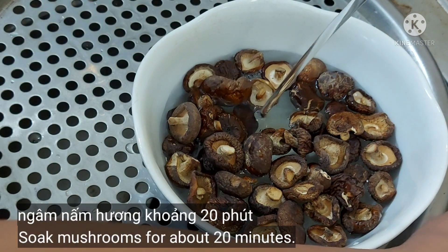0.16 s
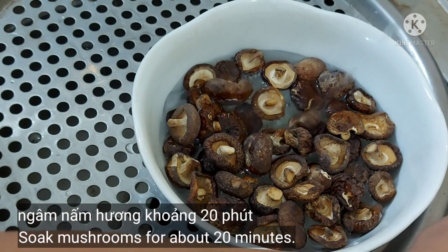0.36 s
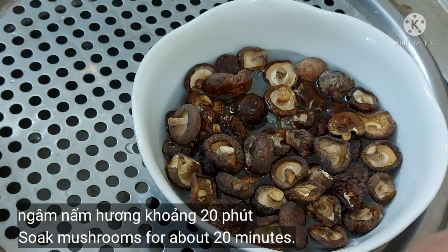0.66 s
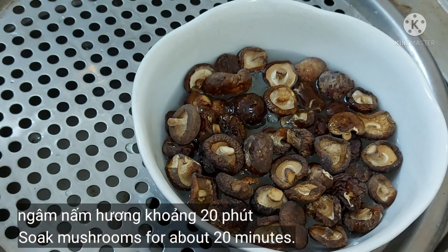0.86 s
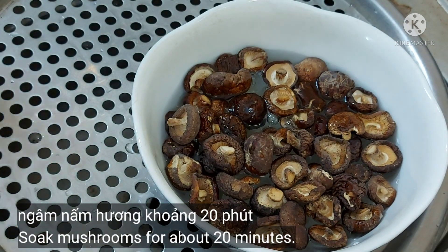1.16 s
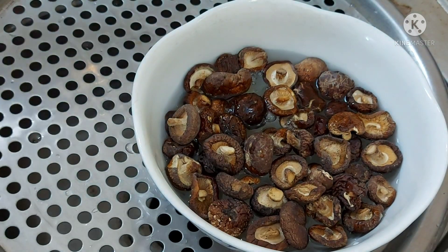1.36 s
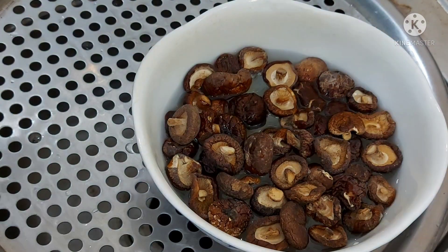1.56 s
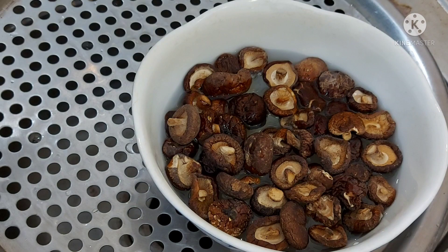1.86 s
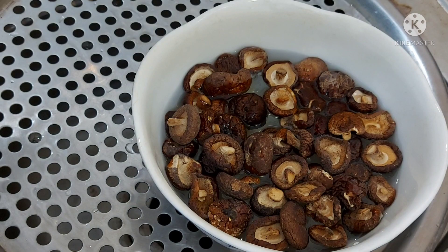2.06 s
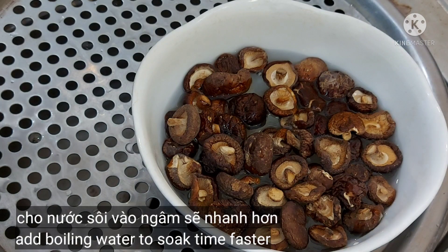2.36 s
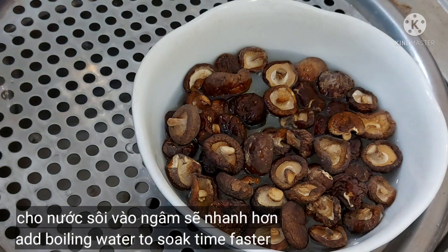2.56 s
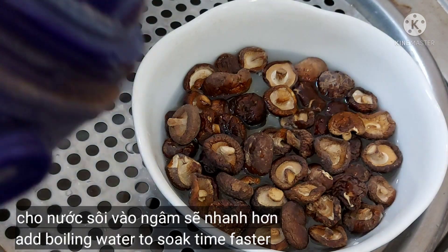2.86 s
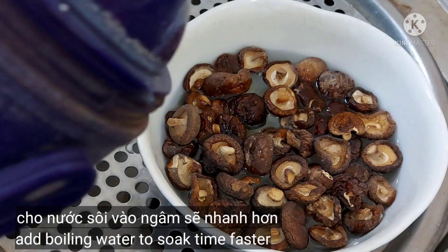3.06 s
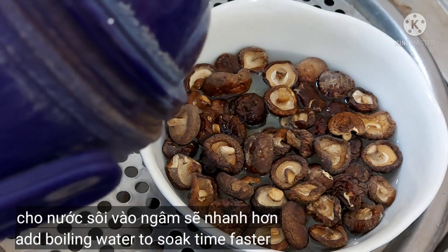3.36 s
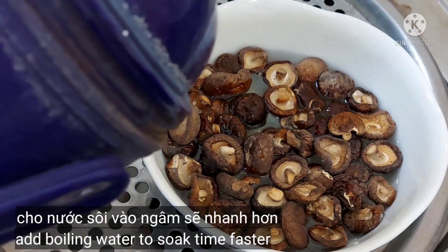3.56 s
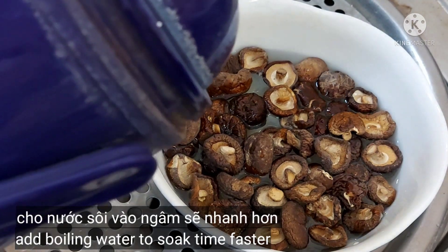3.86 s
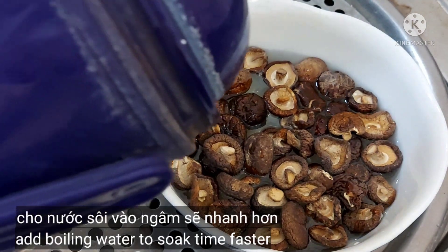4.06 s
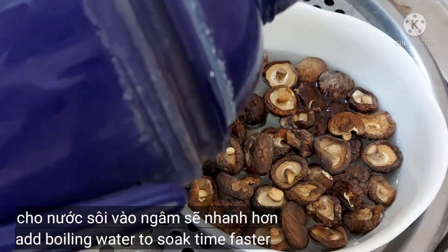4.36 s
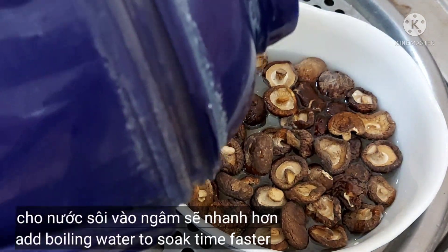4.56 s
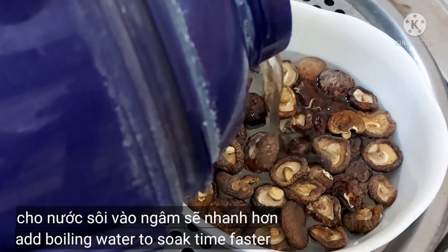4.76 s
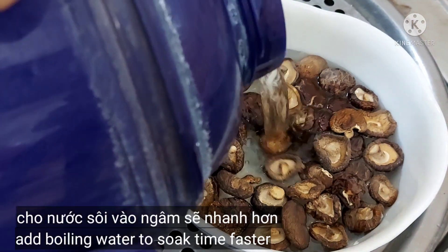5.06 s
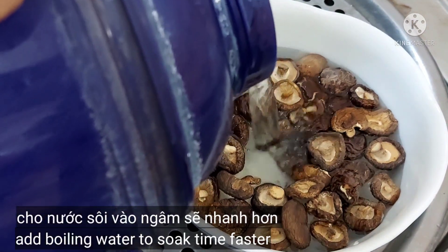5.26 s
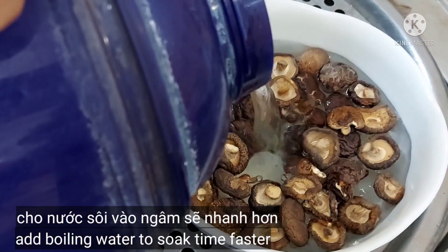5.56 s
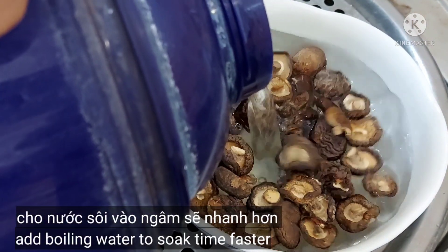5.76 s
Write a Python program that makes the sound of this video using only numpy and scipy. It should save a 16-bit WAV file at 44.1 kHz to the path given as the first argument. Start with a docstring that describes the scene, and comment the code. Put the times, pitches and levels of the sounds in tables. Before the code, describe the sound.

Ceramic and metal knocks on a thin metal worktop in a humming, echoing kitchen, then hot water pours from a flask into a bowl of mushrooms.

```python
"""A quiet kitchen, two spaced microphones: room noise (shaped noise), an appliance's hum and a thin tone (sines),
and a faint noise rustle that comes and goes. From 0.4 s vessels knock on a metal worktop, mostly off to the left:
noise bursts, sheet modes and low thuds, with hard walls ringing as sparse echoes. At 1.5 s an edit fades to silence
and back, then more knocks and two low glugs near 3 s (dying sines). From 4.7 s hot water slides from a flask into
a bowl: a fizz of tiny sine grains, spatters of band noise, and bubbles of rising pitch."""
import sys
import numpy as np
from scipy import signal
from scipy.fft import rfft, irfft
from scipy.io import wavfile
from scipy.ndimage import uniform_filter1d

SR = 44100
rng = np.random.default_rng(int(sys.argv[2]) if len(sys.argv) > 2 else 0)


def digitize_waveform(pressure):
    """Quantize a signal to 16-bit integers and store it at the path in sys.argv[1].

    Rows of a 2-D input are taken as channels; values are limited to [-1, 1].
    """
    field = np.atleast_2d(pressure).T
    bounded = np.clip(field, -1, 1)
    quanta = np.round(bounded * 32767).astype(np.int16)
    wavfile.write(sys.argv[1], SR, quanta)


N = 261072

# Spectrum of the room noise: [f/Hz, relative level/dB per Hz]
ROOM_COLOUR = [(36, -49), (44, 0), (70, -17.5), (90, -2), (130, -3), (160, -5.5), (260, -12), (320, -6.5),
               (390, -16), (600, -16), (1250, -27.5), (1800, -31.5), (5200, -45.5), (7000, -48),
               (8400, -41.5), (9800, -48.5), (12000, -45), (15200, -55.5), (15800, -75)]
ROOM_DB = -45  # rms ahead of the bass cut
# Likeness of the two microphones in noise: [f/Hz, correlation -1..1]
MIC_LIKENESS = [(60, 0.99), (180, 0.86), (550, 0.37), (1650, -0.2), (4970, 0.0066), (15000, -0.096)]
# Left microphone over right in noise: [f/Hz, level difference/dB]
MIC_LEAN = [(60, -2), (300, 5.5), (1000, 1.5), (4000, 1.6), (15000, 1.7)]
# Appliance hum, a motor shaft (49 Hz and its 4th order) beside the mains buzz: [f/Hz, rms level/dB]
HUM_TONES = [(49.0, -53), (196.0, -56), (100.07, -50.5), (200.2, -53.5), (300.3, -59)]
# Thin tone that swells and sinks before the edit: [t/s, level/dB ahead of its wobble]
WHINE_LEVEL = [(0, -89), (.09, -68), (.178, -75), (.288, -58.5), (.356, -68), (.375, -85), (.41, -62),
               (.45, -80), (.63, -80), (.68, -61.5), (.842, -55), (.9, -76), (1.1, -70), (1.21, -59),
               (1.24, -68), (1.372, -56), (1.406, -82), (1.49, -53.5), (1.53, -70)]
# Fainter tone after the edit: [t/s, rms level/dB]
FAINT_LEVEL = [(2.3, -85), (2.6, -67), (3.1, -73), (4.2, -79), (5.92, -78)]
WHINE_HZ, FAINT_HZ = 987, 1211
# Broad rustle over the room noise, one list a stretch: [t/s, rms level/dB]
RUSTLE_STRETCHES = [
    [(0, -84), (.28, -78), (.5, -57.5), (.8, -80), (.93, -72), (1.1, -64), (1.38, -59.5), (1.45, -52.5),
     (1.54, -51.5)],
    [(1.79, -84), (1.83, -59), (1.95, -75), (2.15, -71), (2.2, -49), (2.26, -58), (2.32, -68), (2.78, -67),
     (3.2, -77)],
]
# Spectrum of the rustle: [f/Hz, relative level/dB per Hz]
RUSTLE_COLOUR = [(500, -29), (800, -13), (2000, -6), (3000, -10.5), (6000, -14), (8500, -15.5),
                 (12500, -13.5), (15200, -18), (15800, -44)]

# Knocks: [t/s, crack drive level/dB, treble lift/dB, contact length/s, clack f/Hz, thud level/dB, thud f/Hz,
# left over right/dB, room level/dB]
KNOCK_EVENTS = [(0.412, -57.5, 20.5, 0.0031, 7750, -58, 195, 6, -3.5),
                (.465, -37, -4.5, 0.0064, 920, -22.5, 307, 6, -3),
                (.499, -44, -8, 0.0035, 4100, -32.5, 132, 6, -10),
                (.501, -46.5, 9.5, 0.0011, 7000, -48, 200, -10, -4),
                (.526, -56, -6, 0.0025, 1100, -30, 111, 1, -11),
                (1.766, -56, -4, 0.0037, 2500, -62, 201, 11, 7),
                (1.779, -68, 3, 0.0018, 9000, -38, 312, 20, 10.5),
                (1.807, -44, 0.5, 0.0017, 1500, -33, 135, 9.5, -5),
                (1.844, -50, -7, 0.0094, 1500, -36.5, 98, 3, 5.5),
                (1.859, -50.5, 1, 0.0026, 11000, -36, 273, 20, 6.5),
                (1.89, -35.5, -3, 0.0071, 3980, -32, 340, 9.5, -4.5),
                (2.109, -50.5, -11, .004, 1080, -36.5, 310, 22, 6),
                (2.151, -41.5, -7, 0.0086, 1700, -41, 293, 13.5, -3),
                (2.21, -31.5, -3, 0.0063, 2010, -32, 279, 8.5, -9),
                (2.234, -47, -5, 0.0057, 2000, -34, 414, -2, 4.5),
                (2.265, -50, 4, .004, 11000, -33, 113, 4, 0),
                (2.299, -37.5, 1, 0.0021, 2030, -29.5, 126, 5, 1.5),
                (2.317, -33, 3.5, 0.0025, 3270, -24.5, 287, 16, -5),
                (2.639, -57.5, 9, .006, 5040, -58, 223, 11, -2),
                (2.955, -55, 2, 0.0057, 2760, -68, 158, 15, 6),
                (3.037, -56, 3, .0023, 11500, -43, 184, 13, -2),
                (3.189, -56.5, 6, .003, 2500, -40, 183, 6, -9),
                (3.25, -34, 1, .0067, 1530, -39.5, 161, -17, 6.5),
                (3.254, -32, 2, .011, 12000, -27, 316.6, 12.5, 4),
                (3.273, -29.5, -8, 0.0067, 1460, -28, 251, -3, -5),
                (3.298, -35, -14, .012, 760, -25, 234, 1, 2.5),
                (3.438, -50.5, 1.5, .0042, 13000, -39, 232, 14, 6.5),
                (4.433, -54.5, 3.5, .005, 12000, -44, 190, 10, -2)]
# Spectrum shared by the cracks: [f/Hz, relative level/dB]
CRACK_COLOUR = [(80, 9), (150, 19.5), (500, 11), (1200, 15), (2500, 8.5), (4000, 3), (6000, -2.5),
                (8500, -2), (12000, -3.5), (16000, -17.5)]
# Modes of the sheet-metal worktop: [f/Hz, relative level/dB, t60/s]
WORKTOP_MODES = [(638, 0, .22), (755, -3, .35), (819, -6, .25), (914, -6, .22), (959, -4, .25),
                 (1288, -7, .25), (1324, -10, .25), (1464, -9, .35), (1693, -9, .2), (2130, -12, .2),
                 (2400, -14, .15), (3700, -14, .1)]
CLACK_DB, CLACK_WIDTH = 6, 0.18  # boost at the vessel's resonance; its half-width as a share of the pitch
SWELL_S, SWELL_PER_CONTACT = 0.0033, 1.27  # thud rise time: base, plus seconds per second of contact
# Ringing of the hard walls: [f/Hz, t60/s]
WALL_T60 = [(100, 1), (250, 0.69), (1000, 0.72), (3000, 0.69), (6000, 0.64), (10000, 0.42), (15000, 0.47)]

# Edit: fade begins, silence, return begins, full level; both fades change fastest early
OUT_S, SILENT_S, BACK_S, FULL_S = 1.495, 1.565, 1.666, 1.784
OUT_BEND, BACK_BEND = 2.8, 2.4

# Loudest bubbles, from low glugs of air in the flask to small ones under the stream:
# [t/s, nominal peak level/dB, f/Hz]
BUBBLE_EVENTS = [(2.959, -33, 682), (3.019, -37, 683), (4.744, -44, 830), (4.778, -41, 3790),
                 (4.813, -43, 990), (4.874, -36.5, 787), (4.979, -44, 830), (5.029, -35.5, 1894),
                 (5.1063, -54, 1640), (5.1108, -39.5, 3780), (5.1377, -41.5, 4380), (5.222, -40, 568),
                 (5.243, -31, 680), (5.2599, -36.5, 3610), (5.264, -41, 590), (5.2714, -41.5, 3070),
                 (5.295, -38, 750), (5.2959, -45, 2130), (5.3926, -52, 3340), (5.5353, -52, 3000)]
BUBBLE_T60_S, SHORTER = 0.039, 0.55  # decay at 1000 Hz; power by which it shrinks with pitch
RISE = 0.16  # half the share by which the smallest bubbles climb in pitch over one t60
# Strength of the stream: [t/s, rms level/dB of its fizz]
STREAM_LEVEL = [(4.68, -91), (4.74, -66), (4.8, -57.5), (4.97, -58.5), (5.04, -54.5), (5.14, -53.5),
                (5.2, -63.5), (5.29, -51), (5.35, -67), (5.5, -59.5), (5.63, -62.5), (5.72, -68),
                (5.8, -59.5), (5.92, -62.5)]
# Spectrum of the fizz: [f/Hz, relative level/dB per Hz]
FIZZ_COLOUR = [(600, -10), (1200, -1), (2000, -1.5), (2700, -5), (3800, -3), (6900, -14), (8300, -10),
               (14500, -11.5), (16000, -35)]
# Loudest spatters: [t/s, peak level/dB of the two microphones' mean before panning, centre f/Hz, left over right/dB]
SPATTER_EVENTS = [(4.742, -52, 5500, -3), (4.778, -46, 11500, 2), (4.786, -41.5, 10700, 1),
                  (4.8747, -42.5, 7990, -7), (4.878, -41.5, 10500, 9), (4.9227, -38, 6800, .4),
                  (4.9267, -38.5, 13500, 1.1), (5.0098, -40.5, 8670, -8), (5.014, -42, 8500, -.4),
                  (5.0214, -38.5, 10100, .1), (5.0443, -41, 10500, 9), (5.096, -38, 8500, -2),
                  (5.1017, -47, 7850, -4), (5.1307, -39, 8950, 9), (5.15, -39, 8380, -9),
                  (5.1766, -39.5, 9900, 7), (5.2619, -41, 7930, -5), (5.2799, -33.5, 6500, -3),
                  (5.391, -45.5, 5880, -4), (5.4725, -42, 11200, 1), (5.6192, -41, 8700, -6),
                  (5.7784, -44, 6105, .4)]
SPATTER_WIDTH, SPATTER_S = 0.26, 0.0029  # share of the centre; decay time constant
# Small events in between: level over the fizz, and full spread, in dB
STRAY_SPATTER_DB, STRAY_BUBBLE_DB, STRAY_SPREAD_DB = 4.5, 2, 7
EDGE_HZ = 16300  # upper band limit


def gain_of(db):
    """Decibels to an amplitude factor."""
    return 10 ** (np.asarray(db) / 20)


def evened(x):
    """Scales to rms 1."""
    return x / np.sqrt(np.mean(x ** 2) + 1e-20)


def read(points, hz):
    """Reads a spectrum table on a log-frequency axis."""
    f, value = np.transpose(points)
    return np.interp(np.log(hz + 1), np.log(f + 1), value)


def level(rows):
    """Gain in time from [t/s, level/dB] rows, practically silent outside them."""
    s, db = np.transpose(rows)
    return gain_of(np.interp(np.arange(N) / SR, s, db, left=-150, right=-150))


def add(mix, s, sound):
    """Mixes a sound in at second s."""
    part = mix[..., round(s * SR):][..., :sound.shape[-1]]
    part += sound[..., :part.shape[-1]]


def panned(x, pan_db):
    """Places a sound: the left microphone gets pan_db more than the right."""
    return x * gain_of([[pan_db / 2], [-pan_db / 2]])


def wash(points, patchy_db, size):
    """Stereo noise of rms 1 with drifting patches, most alike at the two microphones in the bass."""
    hop = size // 4
    hz = np.fft.rfftfreq(size, 1 / SR)
    frames = N // hop + 5
    a, b, c, d, patches = rng.standard_normal((frames, len(hz), 5)).T
    patches = evened(uniform_filter1d(uniform_filter1d(patches, 10, 0), 10, 1))
    same = np.clip(read(MIC_LIKENESS, hz), -1, 1)[:, None]
    lean = gain_of(read(MIC_LEAN, hz) / 2)[:, None]
    left = a + 1j * b
    right = same * left + np.sqrt(1 - same ** 2) * (c + 1j * d)
    z = np.array([left * lean, right / lean])
    z *= gain_of(read(points, hz)[:, None] + patchy_db * patches)
    return evened(signal.istft(z, nperseg=size, noverlap=size - hop)[1][:, :N])


def room_noise():
    """The still air of the kitchen: steady noise, strongest in the bass."""
    return gain_of(ROOM_DB) * wash(ROOM_COLOUR, 1.0, size=2048)


def hum():
    """Steady tones of the appliance; neighbours beat against each other."""
    t = np.arange(N) / SR
    tones = 0
    for hz, db in HUM_TONES:
        tones = tones + gain_of(db) * np.sqrt(2) * np.sin(2 * np.pi * (hz * t + rng.random()))
    return tones


def narrow(width_hz):
    """Slow complex noise of rms 1: the wandering of a fuzzy tone."""
    z = rng.standard_normal(N) + 1j * rng.standard_normal(N)
    z /= 1 + (np.fft.fftfreq(N, 1 / SR) / width_hz * 2) ** 2
    return np.fft.ifft(z) * N / np.linalg.norm(z)


def whine():
    """Two fuzzy tones, a little stronger on the left: one before the edit, a much fainter one after it."""
    t = np.arange(N) / SR
    tone = ((1 + 0.25 * narrow(20)) * np.exp(2j * np.pi * WHINE_HZ * t)).real * level(WHINE_LEVEL)
    faint = (narrow(12) * np.exp(2j * np.pi * FAINT_HZ * t)).real * level(FAINT_LEVEL)
    return panned(np.sqrt(2) * (tone + faint), 2.8)


def rustle():
    """Broad patchy noise that swells and sinks in two stretches."""
    return wash(RUSTLE_COLOUR, 2.6, size=256) * sum(level(rows) for rows in RUSTLE_STRETCHES)


def contact(t, length):
    """Noise of a contact: soft start, quick end, and an even spectrum without chance peaks."""
    u = t / max(length, .0008)
    shape = np.exp(-u) * (1 - np.exp(-u / 0.042))
    burst = rng.standard_normal(len(t)) * shape
    for _ in range(3):  # flatten the spectrum, then restore the envelope
        z = rfft(burst)
        burst = irfft(z / np.sqrt(uniform_filter1d(abs(z) ** 2, size=5) + 1e-12))
        power = uniform_filter1d(burst ** 2, size=41)
        burst *= shape / np.sqrt(power + 1e-12 + 0.0044 * (burst ** 2).max())
    return burst


def rattled(blow):
    """The vessel rocks and the nearby surfaces answer: a few weaker copies within 14 ms."""
    at, sign = rng.random((2, 5))
    taps = np.zeros(700)
    places = (np.sort(at) * 500 + 110).astype(int)
    taps[places] = np.sign(sign - .5) * 0.43 * gain_of(-1.5 * np.arange(5))
    taps[0] = 1
    return signal.oaconvolve(blow, taps / np.linalg.norm(taps))[:len(blow)]


def knocks():
    """Blows of contact noise with a clack, sheet ringing and a low thud; returns direct sound and room feed."""
    near, far = np.zeros((2, N)), np.zeros((2, N))
    t = np.arange(8192) / SR
    hz = np.fft.rfftfreq(len(t), 1 / SR)
    modes = np.array([gain_of(db - 60 * t / t60) * np.sin(2 * np.pi * f * t) for f, db, t60 in WORKTOP_MODES])
    modes /= np.linalg.norm(modes.sum(0))
    for s, db, treble_db, length, clack_hz, thud_db, thud_hz, pan_db, room_db in KNOCK_EVENTS:
        burst = contact(t, length)
        # the broad resonance of the struck vessel
        clack_db = CLACK_DB / (1 + ((hz - clack_hz) / (CLACK_WIDTH * clack_hz)) ** 2)
        lift_db = np.interp(hz, [4000, 6500], [0, treble_db])
        crack = irfft(rfft(burst) * gain_of(read(CRACK_COLOUR, hz) + lift_db + clack_db))
        # each spot on the sheet wakes the modes differently
        ring = rng.uniform(.2, 1.96, len(modes)) @ modes
        ringing = 0.49 * gain_of(room_db) * signal.fftconvolve(burst, ring)[:len(t)]
        blow = rattled(gain_of(db) * (crack + ringing))
        # from the left: that microphone hears it first
        blow = np.array([np.roll(blow, 14), np.roll(blow, 28)])
        # a longer contact pushes the thud up more slowly
        swell_s = SWELL_S + SWELL_PER_CONTACT * length
        swell = (t / swell_s) ** 2 * np.exp(2 - 2 * t / swell_s)
        thud = gain_of(thud_db) * swell * np.sin(2 * np.pi * thud_hz * t)
        add(near, s, panned(blow, pan_db) + panned(thud, pan_db / 2))
        # much of the thud comes through the worktop, not the air
        add(far, s, gain_of(room_db) * (blow + 0.48 * thud))
    return near, far


def kitchen(x):
    """Wall echoes: sparse, of random sign, each band dying at its own speed, different at each microphone."""
    taps = np.zeros((2, SR))
    at = np.arange(160, SR - 20, 20) + rng.integers(0, 20, (2, (SR - 161) // 20))
    np.put_along_axis(taps, at, rng.choice([-1., 1.], at.shape), 1)
    hz, t, z = signal.stft(taps, SR, nperseg=256)
    apart = np.clip(hz / 500, 0, 1)[:, None]  # long waves reach both microphones alike
    z[1] = apart * z[1] + np.sqrt(1 - apart ** 2) * z[0]
    decay = gain_of(-60 * t / read(WALL_T60, hz)[:, None])
    tail = signal.istft(z * decay, SR, nperseg=256)[1]
    return signal.fftconvolve(x, tail / np.linalg.norm(tail[0]), axes=1)[:, :N]


def strays(count, lo_hz, hi_hz, over_db):
    """Chance events that follow the stream's strength: rows [t/s, peak level/dB, f/Hz, side -1..1]."""
    when, size, pitch, side = rng.random((count, 4)).T
    times, dbs = np.transpose(STREAM_LEVEL)
    s = times[0] + when * (times[-1] - times[0])
    db = np.interp(s, times, dbs) + over_db + STRAY_SPREAD_DB * (size - .5)
    return np.transpose([s, db, lo_hz * (hi_hz / lo_hz) ** pitch, 2 * side - 1])


def chirp(hz, t60, rise):
    """A wet tick, then a dying sine of climbing pitch; small bubbles ragged, large ones smooth and slow to start."""
    t = np.arange(4000) / SR
    small = min(hz / 3000, 1)
    tick = 0.11 * np.diff(rng.standard_normal(len(t) + 1)) * np.exp(-t / .0005)
    wobble = 1 + 0.78 * small * evened(uniform_filter1d(rng.standard_normal(len(t)), int(SR / hz)))
    start = 1 - np.exp(-t * hz / (0.38 + 2.0 * (1 - small)))
    tone = np.sin(2 * np.pi * hz * (t + rise * small * t ** 2 / t60))
    return small * tick + wobble * start * tone * gain_of(-60 * t / t60)


def bubbles():
    """Trapped air ringing in the water: low glugs and small bubbles, the higher the shorter."""
    out = np.zeros((2, N))
    small = strays(count=50, lo_hz=800, hi_hz=4280, over_db=STRAY_BUBBLE_DB)[:, :3]
    for s, db, hz in [*BUBBLE_EVENTS, *small]:
        add(out, s, gain_of(db) * chirp(hz, BUBBLE_T60_S * (1000 / hz) ** SHORTER, RISE))
    return out


def fizz():
    """Countless tiny bubbles of a few cycles, in clumps; the big low ones are rarer, longer and more uneven."""
    n = N - round(STREAM_LEVEL[0][0] * SR)
    out, t = np.zeros((2, N)), np.arange(1024) / SR
    clumps = gain_of(4.0 * evened(uniform_filter1d(rng.standard_normal(n), 500)))
    for hz in np.geomspace(550, 15000, num=40):
        cycles = rng.uniform(5.5, 17)
        envelope = np.exp(-t * hz / cycles * 2) * (1 - np.exp(-t * hz))
        grain = np.sin(2 * np.pi * hz * t * (1 + 4 * t)) * envelope
        spread_db = np.interp(hz, [3000, 7000], [3.6, 2.4])
        born = rng.random(n) < 160 * (hz / 4000) ** .9 * clumps / SR
        births = born * gain_of(spread_db * np.minimum(rng.exponential(1, n), 4))
        sides = births * rng.uniform(-0.68, 1, (2, n))
        band = evened(signal.oaconvolve(sides, grain[None], axes=1)[:, :n])
        out[:, -n:] += band * gain_of(read(FIZZ_COLOUR, hz)) * np.sqrt(hz)  # bands widen with pitch
    return out / np.sqrt(np.mean(out[:, -n:] ** 2)) * level(STREAM_LEVEL)


def spatters():
    """Small splashes: bursts of band noise that die in milliseconds, each at its own place."""
    out, t = np.zeros((2, N)), np.arange(1024) / SR
    f = np.fft.rfftfreq(len(t), 1 / SR)
    small = strays(count=40, lo_hz=4000, hi_hz=12000, over_db=STRAY_SPATTER_DB) * [1, 1, 1, 7]  # side to dB
    for s, db, hz, pan_db in [*SPATTER_EVENTS, *small]:
        middle, side = rng.standard_normal((2, len(t))) * [[1], [.5]] * np.exp(-t / SPATTER_S)
        peak = 1 / (1 + ((f - hz) / (SPATTER_WIDTH * hz)) ** 2) ** 2
        band = (0.21 + peak) * np.clip(f / 4000, 0, 1) ** 2
        spit = irfft(rfft(middle + side * [[1], [-1]]) * band)
        add(out, s, panned(gain_of(db) * spit / abs(spit.mean(0)).max(), pan_db))
    return out


def scene():
    """Room noise, hum, whine, rustle, knocks and water, with the walls answering knocks and water."""
    floor = room_noise() + panned(hum(), .5) + whine() + rustle()
    near, far = knocks()
    water = bubbles() + fizz() + spatters()
    echoes = kitchen(far + gain_of(-5.5) * water) * gain_of([[-.4], [.8]])
    return floor + near + water + echoes


def record(dry):
    """The microphone's bass cut, the edit's fade through silence, then the band limit."""
    t = np.arange(N) / SR
    cut = signal.sosfilt(signal.butter(6, 41, "high", fs=SR, output="sos"), dry)
    out = np.clip((SILENT_S - t) / (SILENT_S - OUT_S), 0, 1) ** OUT_BEND
    back = 1 - np.clip((FULL_S - t) / (FULL_S - BACK_S), 0, 1) ** BACK_BEND
    lowpass = signal.firwin(511, EDGE_HZ, window=("kaiser", 9), fs=SR)
    return signal.oaconvolve(cut * (out + back), lowpass[None], "same")


dry = scene()
out = record(dry)
digitize_waveform(out)
```